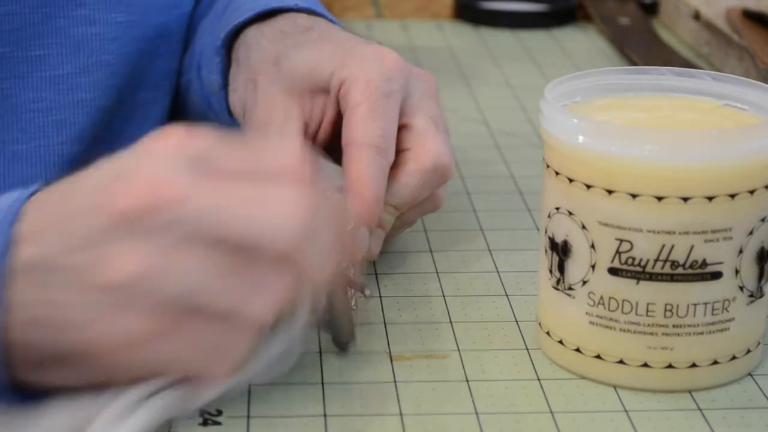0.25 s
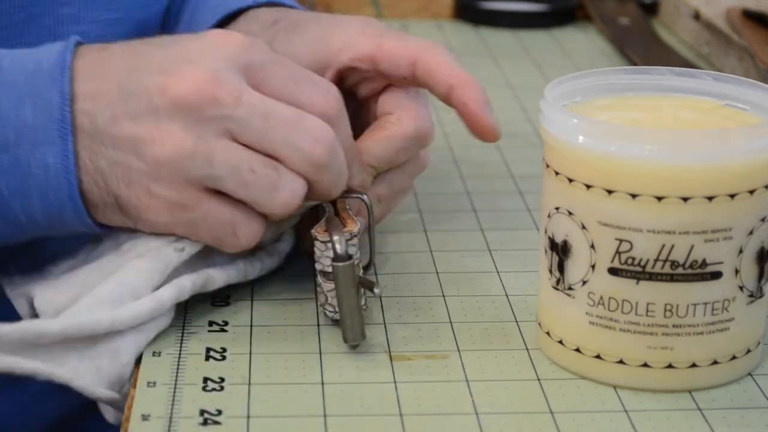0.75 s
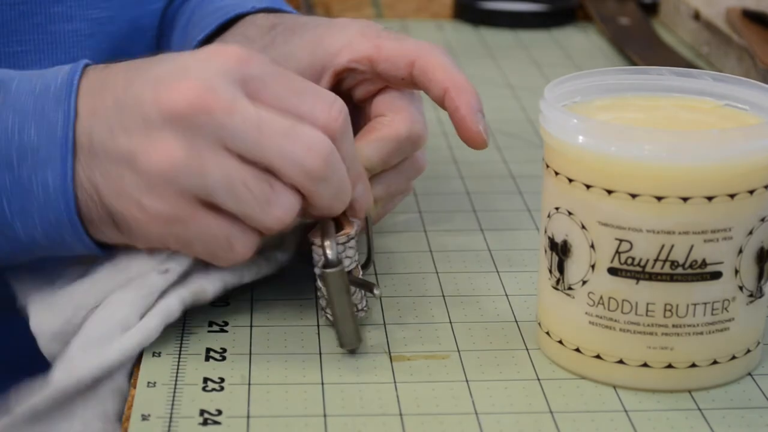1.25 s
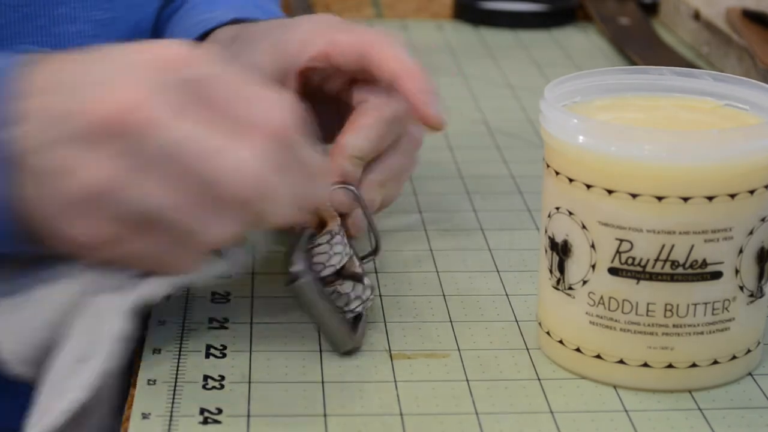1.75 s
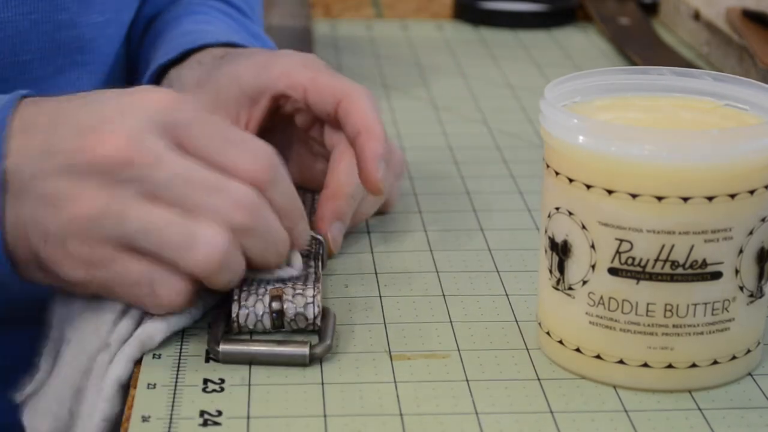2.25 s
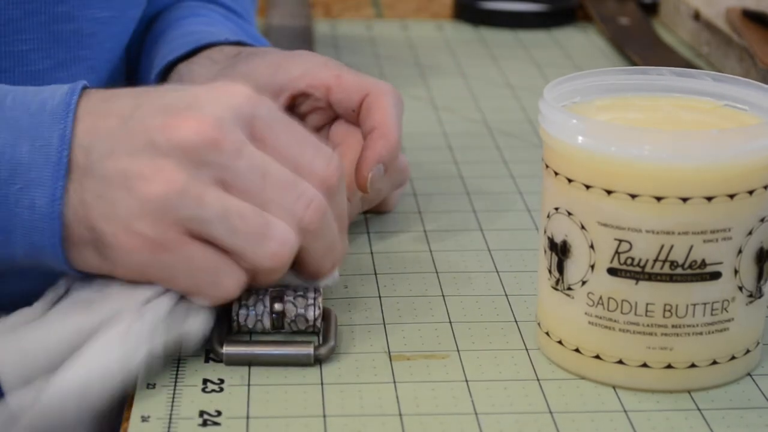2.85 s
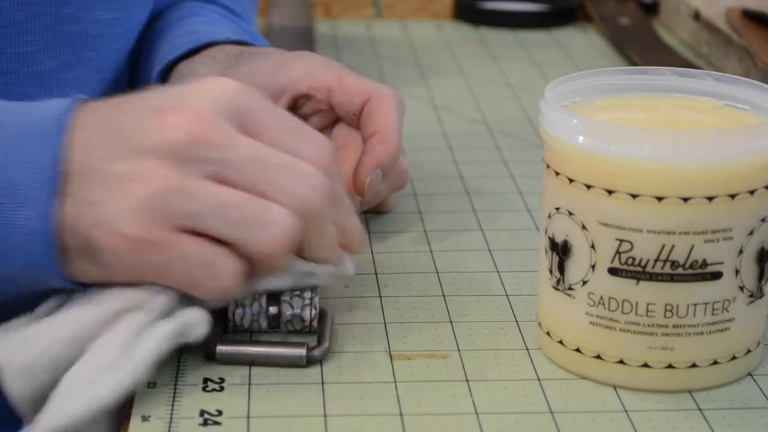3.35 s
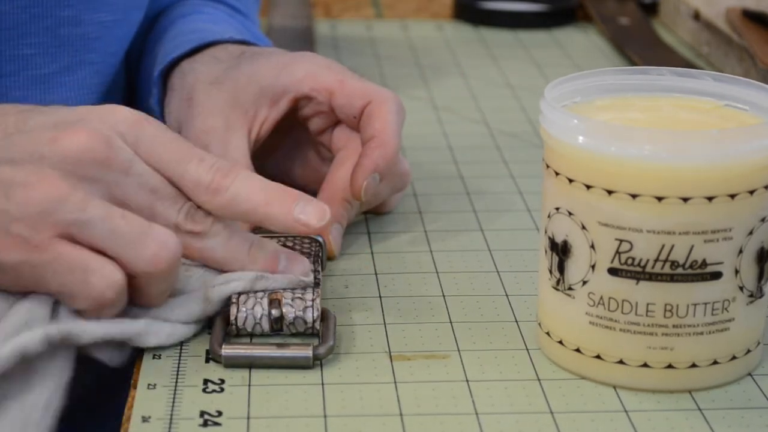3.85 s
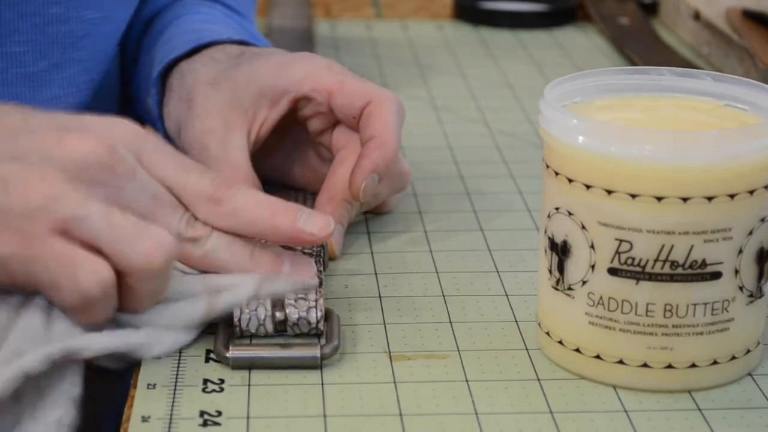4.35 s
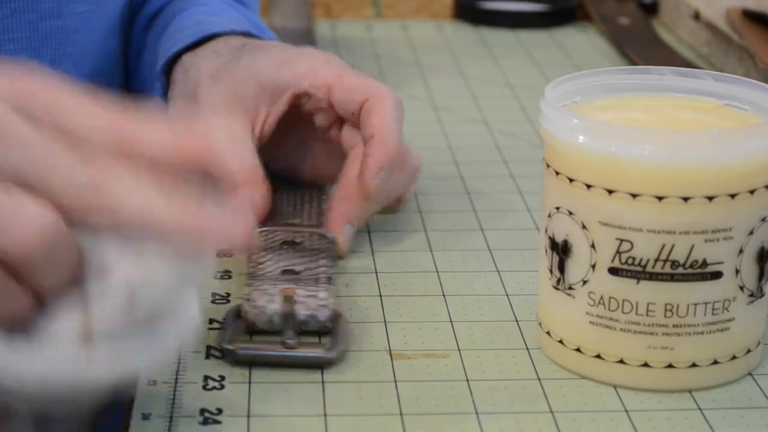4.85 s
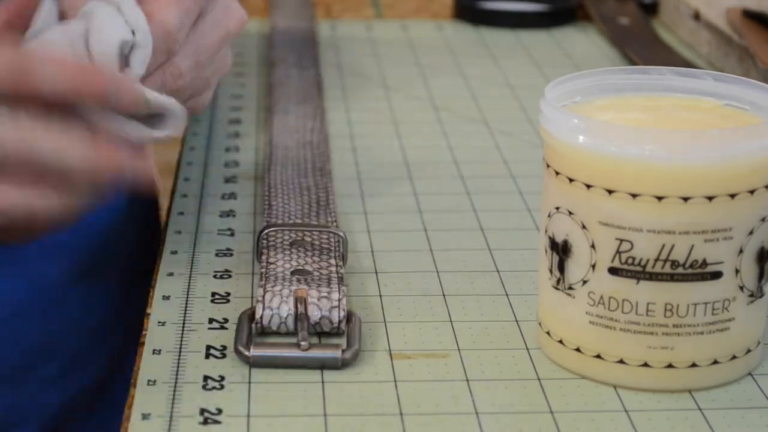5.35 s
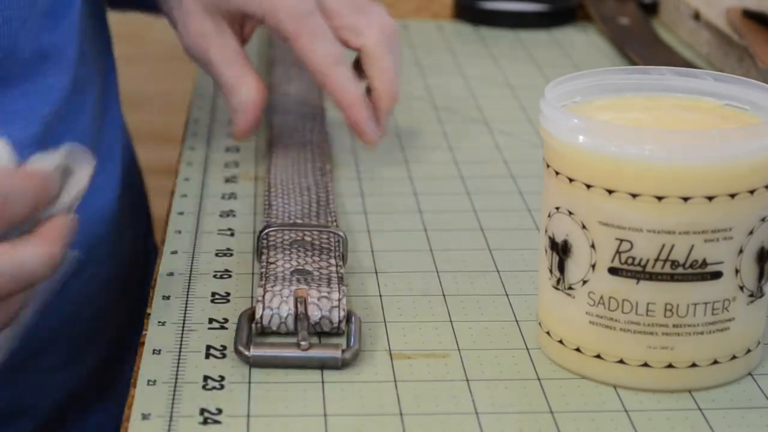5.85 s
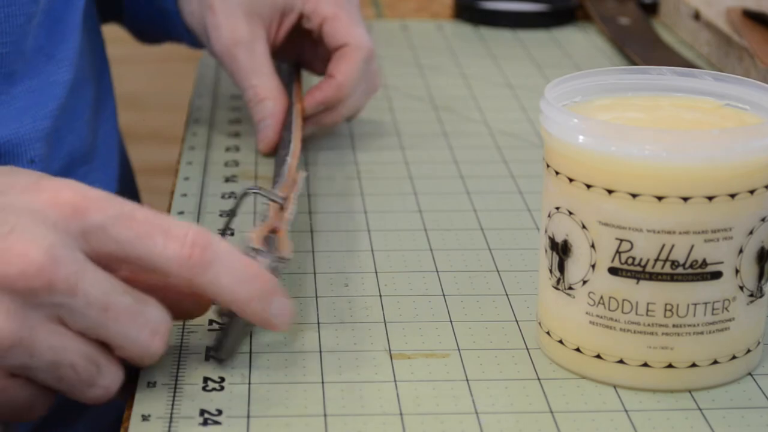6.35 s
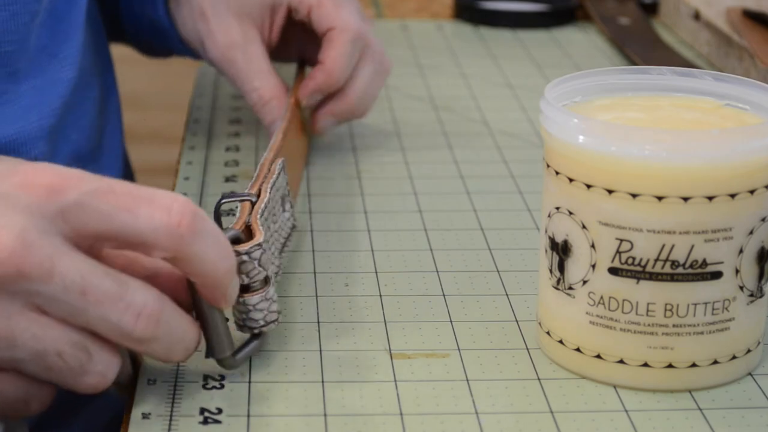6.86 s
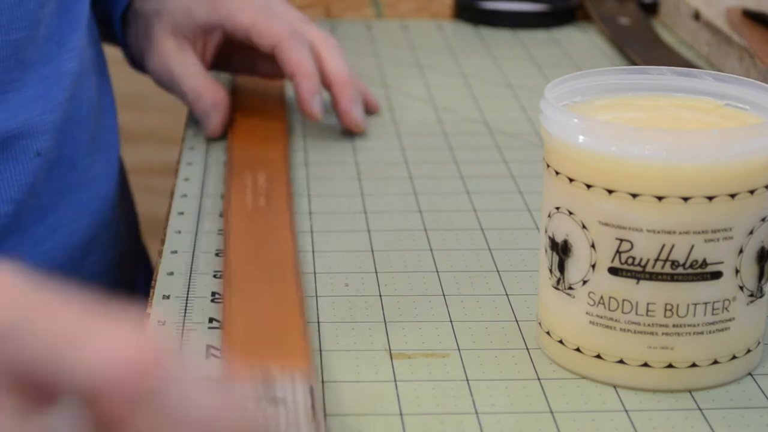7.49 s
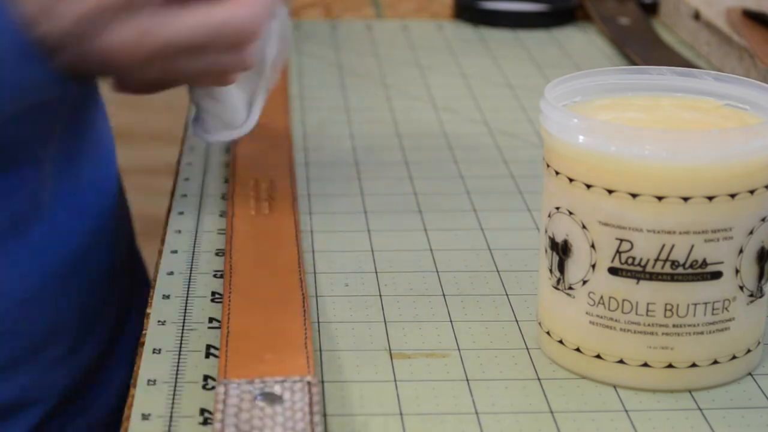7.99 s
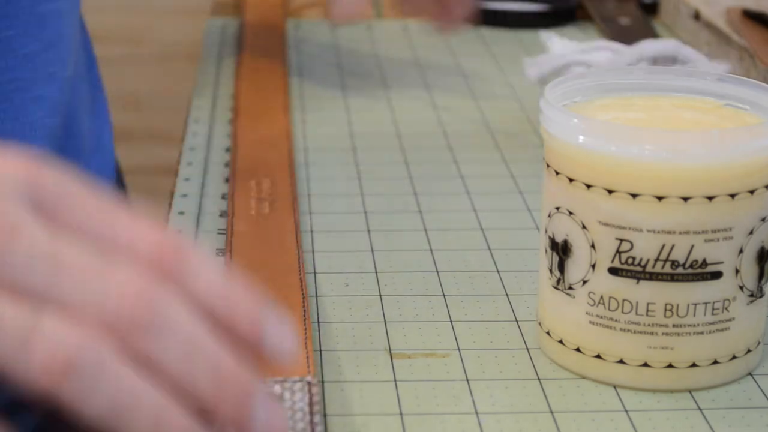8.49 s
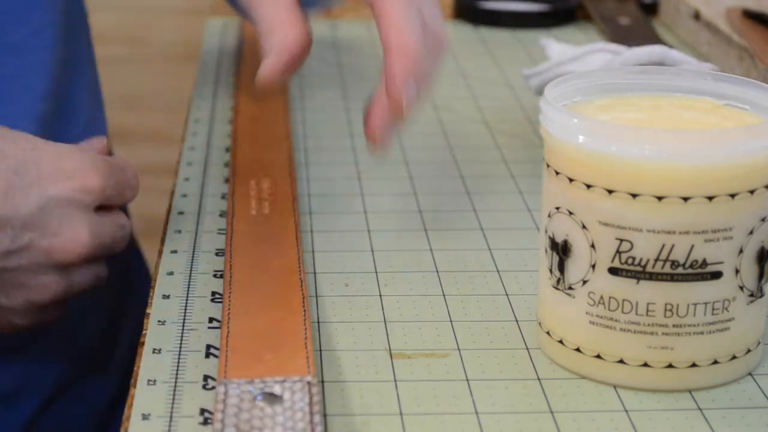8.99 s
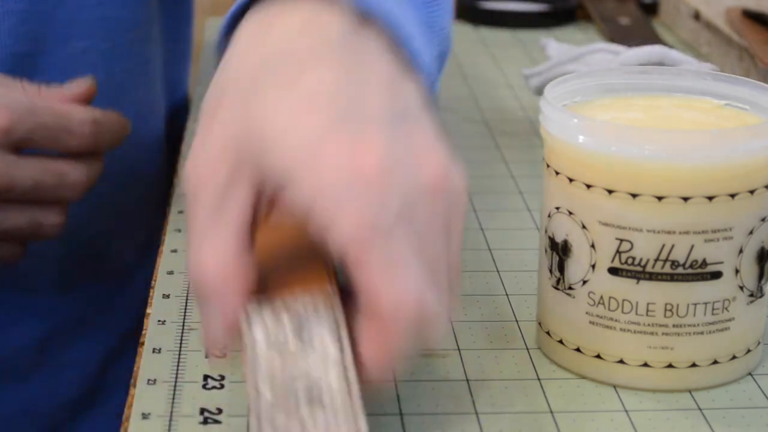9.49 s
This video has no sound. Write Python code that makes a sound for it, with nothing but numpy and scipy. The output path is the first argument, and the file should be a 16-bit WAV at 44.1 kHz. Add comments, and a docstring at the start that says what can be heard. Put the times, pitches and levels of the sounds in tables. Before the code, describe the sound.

Over a constant airy fan and a very faint thin whine, a metal buckle knocks on a matted bench and its loose parts chink. Cloth wipes hiss, then scrub back and forth with a muted tap per push. After sparse light handling, the belt drops with hard clacks and a low slap, and finally slides softly. Close, dry, small-room sound.

```python
"""A leather belt is wiped with a cloth and turned over on a workbench, over a steady ventilation fan and thin whine.
First come hissing wipes, a heavy buckle knock and chinks of the loose prong and roller, then a cluster of knocks.
From 2.5 s the cloth scrubs to and fro with a tap at each push; a knock and a bright chink follow at 4.4 s.
The strap scrapes over the mat, flops down among hard knocks near 7.6 s, and slides again at the end.
Blows are shaped impulses, chinks are decaying steel modes, rubbing is grainy noise; contacts get a small room."""
import sys
import numpy as np
from scipy import signal
from scipy.fft import rfft, irfft, next_fast_len
from scipy.io import wavfile
from scipy.ndimage import map_coordinates

SR = 44100
rng = np.random.default_rng(int(sys.argv[2]) if len(sys.argv) > 2 else 0)


def int16_out(signal):
    """Quantize to a 16-bit WAV file."""
    q = np.round(np.clip(np.atleast_2d(signal).T, -1, 1) * 32767)
    wavfile.write(sys.argv[1], SR, q.astype(np.int16))


N = 429093
TIME = np.arange(N) / SR  # s
SIZE = 2 ** 14  # samples in one contact
GRID = np.fft.rfftfreq(SIZE, 1 / SR)  # Hz

# colour of a dry steel click: (frequency [Hz], relative level [dB])
CLICK_COLOUR = [(1000, -17), (4500, 7.5), (6100, 2.5), (7000, -1), (8200, -1), (10500, -4.5), (13000, -3),
                (15500, -13)]
# cloth drawn along the edge of the upright belt: (time at the fastest [s], length [s], force [dB])
WIPE_STROKES = [(0.026, 0.11, 0), (1.097, 0.075, 0), (1.311, 0.086, 0), (1.52, 0.11, -1), (1.71, 0.083, -2),
                (1.877, 0.059, 1)]
# cloth scrubbed to and fro on the flat belt: (time at the end of the push [s], force [dB])
SCRUB_STROKES = [(2.479, -13.5), (2.657, -5.5), (2.854, 2), (3.0313, 1), (3.1944, -4), (3.344, -2),
                 (3.3633, -2), (3.7835, 0.5), (3.9652, 1.5), (4.1642, 4.5)]
# strap pushed over the mat: (time at the fastest [s], length [s], scrape level [dB], bump over scrape [dB])
STRAP_SLIDES = [(0.738, 0.065, -54.5, 1), (1.89, 0.082, -43.5, -15), (4.726, .11, -50, 4),
                (5.994, 0.1, -52.5, -3), (6.15, 0.11, -50, -11), (9.227, 0.067, -49, -5),
                (9.378, 0.096, -48.5, 1.5), (9.558, 0.12, -45.5, -3.5)]


def amp(db):
    """Decibels to gain."""
    return 10 ** (np.asarray(db) / 20)


def unit(x):
    """Scale to rms 1."""
    return x / np.sqrt(np.mean(np.abs(x) ** 2) + 1e-20)


def along(points, hz):
    """(Hz, value) points read on a log frequency axis."""
    f, v = np.transpose(points)
    return np.interp(np.log(hz + 1), np.log(f + 1), v)


def lift(peaks, hz):
    """Gain of resonances (Hz, width Hz, lift dB) that stand out of a flat response."""
    power = 1
    for f, width, db in peaks:
        power = power + max(amp(db) ** 2 - 1, 0) / (1 + (2 * (hz - f) / width) ** 2)
    return np.sqrt(power)


def wobble(rate):
    """A smooth random curve, rate knots a second."""
    knots = rng.standard_normal(int(N * rate / SR) + 4)
    return map_coordinates(knots, [TIME * rate])


def filtered(x, response):
    """x through a response of frequency."""
    m = next_fast_len(N + SIZE)
    return irfft(rfft(x, m) * response(np.fft.rfftfreq(m, 1 / SR)), m)[:N]


def causal(gain):
    """The most compact impulse (minimum phase) that has this gain on GRID."""
    cepstrum = irfft(np.log(np.maximum(gain, 1e-7)))
    cepstrum[1:SIZE // 2] *= 2
    cepstrum[SIZE // 2 + 1:] = 0
    return irfft(np.exp(rfft(cepstrum)))


def add(track, s, sound):
    """Mix a sound into the track at time s."""
    part = track[max(round(s * SR), 0):][:len(sound)]
    part += sound[:len(part)]


def room(sound, build_s=0.002, wall_hz=6000):
    """One contact with its early reflections and a fresh diffuse tail, at unchanged energy."""
    # reverberation time of the tail: (frequency [Hz], T60 [s])
    tail_t60 = [(100, 0.15), (400, 0.24), (1500, 0.18), (4000, .19), (8000, 0.17), (15000, 0.053)]
    # strength of the tail: (frequency [Hz], tail over direct sound [dB])
    tail_level = [(80, -1), (250, 14.5), (700, 3), (1600, -0.5), (2400, 0.5), (3500, -10.5), (6000, -5.5),
                  (14000, -5.5)]
    # echoes from near surfaces: (delay [s], gain before treble scattering [linear])
    near_walls = [(.0017, .3), (.00415, .65), (.0063, .25)]
    hz, t, noise = signal.stft(rng.standard_normal(SIZE), SR, nperseg=256)
    t60 = along(tail_t60, hz)[:, None]
    tail = signal.istft(noise * amp(-60 * t / t60) / np.sqrt(t60), SR, nperseg=256)[1][:SIZE]
    tail = tail * (1 - np.exp(-(TIME[:SIZE] / build_s) ** 2))  # echoes take a moment to build up
    soft = 1 / (1 + 1j * GRID / wall_hz)  # cluttered surfaces scatter the treble
    early = 1 + soft * sum(g * np.exp(-2j * np.pi * GRID * delay) for delay, g in near_walls)
    wet = amp(along(tail_level, GRID))
    total = np.sqrt(1 + np.abs(soft) ** 2 * sum(g * g for delay, g in near_walls) + wet ** 2)
    direct_path = early * rfft(causal(1 / total))
    tail_path = unit(rfft(tail)) * rfft(causal(wet / total))
    path = irfft(direct_path + tail_path)
    return signal.fftconvolve(sound, path[:-SIZE // 8])  # without the last eighth, where the circle wraps


def chatter(bounce_db=-11, spread_s=0.0023, count=5):
    """A first contact followed by a few weak micro-bounces, energy 1."""
    train = np.zeros(SIZE)
    train[0] = 1
    for wait, size in zip(rng.exponential(size=count), rng.standard_normal(count)):
        add(train, spread_s * wait, np.array([amp(bounce_db) * size]))
    return train / np.linalg.norm(train)


def blow(parts, hard_db, weight_db, click_db, contact_hz, steep=6):
    """A cushioned landing is mostly thud; bare steel adds snap and a chattering click."""
    snap_reach = 1.88  # the snap reaches this many times higher than the knock
    thud, knock, snap, click = parts

    def cushion(edge_hz):
        """A long contact excites no treble."""
        return 1 / np.sqrt(1 + (GRID / edge_hz) ** (2 * steep))

    bench = causal(np.hypot(amp(weight_db) * thud, knock) * cushion(contact_hz))
    steel_snap = causal(snap * cushion(snap_reach * contact_hz))
    steel_click = amp(click_db) * signal.fftconvolve(click, chatter())[:SIZE]
    return bench + amp(hard_db) * (steel_snap + steel_click)


def knocks(snap_gain_db=1):
    """The buckle lands freely on the bench, and each scrub rocks it into a tap under the fingers."""
    # landings, before cushioning and the snap gain:
    # (time [s], knock level [dB], hardness = snap over knock [dB], weight = thud over knock [dB],
    #  steel click over snap [dB])
    landings = [(0.248, 8.5, -35, -2.5, -7), (1.0876, -22.5, -2.5, -2, -7), (1.6527, -16.5, -13, -11, -20),
                (1.9257, 0.5, -6.5, -3.5, -7.5), (1.9282, 6, -11.5, -20, -9), (1.9364, -1.5, -7, -11, -24),
                (1.9725, -9.5, -2.5, -24, -13), (1.9833, -2.5, -13, -26, -10),
                (2.013, -12.5, -13, -18, -19), (3.085, -9, -24, -16, -15), (4.4354, 8.5, -14.5, -17, -8.5),
                (4.8066, -13.5, -26, -18, -20), (6.0975, -26.5, 0, -7, -11), (6.139, -19, -13, -2, -9),
                (7.5508, 3.5, -9.5, -8.5, -12), (7.581, -4.5, -10, -2, -12),
                (7.5926, 4.5, 1.5, -2.5, -12.5), (9.4708, -20.5, -6.5, -2, -15), (9.5396, -22, -6, -6, -21)]
    # colours of the low, middle and upper part of a blow: (frequency [Hz], relative level [dB])
    thud_colour = [(30, -57), (100, -7.5), (160, -15.5), (220, -4), (300, 0.5), (380, -3), (500, 1.5),
                   (650, -1), (1000, -6.5), (3000, -81)]
    knock_colour = [(100, -51), (450, -14), (650, -4), (1000, 5), (1300, -4), (1600, -0.5), (1900, -4),
                    (2350, 6.5), (3200, -22), (6000, -94)]
    snap_colour = [(1000, -52), (2200, -9), (2700, 2.5), (3100, 2), (3800, 0), (4200, -10), (4700, -11),
                   (5300, -35.5), (9000, -53)]
    # resonances of the buckle lying on the bench: (frequency [Hz], width [Hz], lift [dB])
    buckle_modes = [(228, 54, 4), (480, 45, -3.5), (990, 71, -2), (1120, 51, 5), (1262, 30, 0),
                    (1317, 37, 12.5), (1559, 67, 11), (1580, 40, 10), (1754, 4.5, 11.5), (1994, 22, 14),
                    (2440, 38, 4), (2644, 120, 10.5), (2970, 70, 6), (3120, 390, 6), (3600, 220, 2.5),
                    (3890, 130, 4.5), (4410, 110, 8)]
    # fingers damp some resonances and leave others: (frequency [Hz], gain [dB])
    held_colour = [(300, 2.5), (900, 0.5), (1550, 2), (2400, -3.5), (3100, 1.5), (3500, 2.5), (3900, 2.5),
                   (4700, -1.5), (8000, -3)]
    # a harder contact is shorter and reaches higher
    base_contact_hz, hardness_db_per_octave = 2850, 27
    # tap at scrub force 0 dB, before the fingers damp it
    tap_db, tap_hardness_db, tap_weight_db, tap_click_db, tap_contact_hz = -9, -10.5, -15, -11, 1990
    body = lift(buckle_modes, GRID)
    colours = thud_colour, knock_colour, snap_colour, CLICK_COLOUR
    thud, knock, snap, click = [unit(amp(along(colour, GRID)) * body) for colour in colours]
    parts = thud, knock, amp(snap_gain_db) * snap, causal(click)
    out = np.zeros(N)
    for s, db, hard_db, weight_db, click_db in landings:
        contact_hz = base_contact_hz * 2 ** (hard_db / hardness_db_per_octave)
        landing = blow(parts, hard_db, weight_db, click_db, contact_hz)
        add(out, s, amp(db) * room(landing))
    held = causal(amp(along(held_colour, GRID)))
    for s, force_db in SCRUB_STROKES:
        free_tap = blow(parts, tap_hardness_db, tap_weight_db, tap_click_db, tap_contact_hz)
        tap = signal.fftconvolve(free_tap, held)[:SIZE]
        add(out, s, amp(tap_db + force_db) * room(tap))
    return out


def flops():
    """The strap falls flat and slaps the bench with a low, ringless push."""
    # (time [s], energy [dB])
    slaps = [(7.553, -8), (7.594, 1)]
    # (frequency [Hz], relative level [dB])
    slap_colour = [(30, -24), (70, -14), (120, -17), (175, -3), (265, -0.5), (340, -8), (600, -42),
                   (2000, -72)]
    out = np.zeros(N)
    push = causal(unit(amp(along(slap_colour, GRID))))
    for s, db in slaps:
        add(out, s, room(amp(db) * push))
    return out


def ring(modes, scatter_db=3, detune=0.0043):
    """Steel modes of energy 1; each touch loads the parts anew and shifts their strength and pitch."""
    t = TIME[:SIZE]
    x = np.zeros(SIZE)
    for hz, db, t60 in modes:
        strength, pitch, phase = rng.standard_normal(3)
        decay = amp(db + scatter_db * strength - 60 * t / t60)
        x += decay * np.sin(2 * np.pi * hz * (1 + detune * pitch) * t + np.pi * phase)
    return x / np.linalg.norm(x)


def chinks(level_db=-1, touch_db=-9):
    """Loose prong and roller rattle on the frame, also at every wipe; each touch ticks and renews the ring."""
    # prong and roller swinging against the frame, before the overall level_db:
    # (time [s], energy of the low modes [dB], energy of the high modes [dB])
    swings = [(0.248, -28, -39), (0.296, -38, -46), (0.3373, -25.5, -53), (0.348, -34, -52),
              (1.2656, -43, -54), (1.3834, -43, -50), (1.778, -39, -52), (1.925, -22, -40),
              (4.434, -33, -19), (6.1166, -46, -38), (6.253, -40.5, -59), (7.5427, -26, -50),
              (7.585, -25, -15.5)]
    # free ringing of the steel parts: (frequency [Hz], relative level [dB], T60 [s])
    low_modes = [(5750, -4, 0.082), (6030, -1, 0.065), (6180, -5, 0.11), (5970, -10, 0.052),
                 (7900, -7, 0.093), (8600, 1, 0.076), (9100, -1, 0.049), (9500, -13, 0.067)]
    high_modes = [(10800, -10, .04), (12200, 2, 0.04), (12960, -2, 0.12), (13400, -2, .04),
                  (14160, -2, .045), (14900, -8, .03)]
    wipe_chink_db = -38.5  # at wipe force 0 dB, before level_db
    shake_high_db = -12  # a prong that is only shaken rings less in its high modes
    shaken = []
    for s, length_s, force_db in WIPE_STROKES:
        low_db = wipe_chink_db + force_db
        shaken.append((s, low_db, low_db + shake_high_db))
    out = np.zeros(N)
    click = causal(unit(amp(along(CLICK_COLOUR, GRID))))
    for s, low_db, high_db in swings + shaken:
        low = amp(low_db) * (amp(touch_db) * click + ring(low_modes))
        touch = low + amp(high_db) * ring(high_modes)
        rattle = signal.fftconvolve(touch, chatter(bounce_db=-15, spread_s=0.0086))[:SIZE]
        add(out, s, room(rattle))
    return amp(level_db) * out


def nails():
    """Tiny dry contacts of nails and buckle, too damped to ring."""
    # (time [s], energy [dB])
    ticks = [(2.0235, -38), (2.4774, -43), (2.497, -41), (2.6707, -34), (2.9547, -42), (3.0506, -34),
             (4.6905, -42), (4.9029, -40), (5.55, -41), (6.7925, -42), (6.993, -41), (7.3264, -43),
             (7.7085, -43)]
    out = np.zeros(N)
    click = causal(unit(amp(along(CLICK_COLOUR, GRID))))
    for s, db in ticks:
        add(out, s, room(amp(db) * click))
    return out


def swell(s, length_s, db):
    """Gain of one hand movement that speeds up and slows down around time s."""
    u = (TIME - s) / length_s
    return amp(db) / (1 + (2 * u) ** 2) ** 2 * (np.abs(u) < 3)  # silent beyond 3 lengths


def scrubbing(offset_s):
    """Gain of all scrub strokes, fastest offset_s after their taps; rubbing grows less than force."""
    push_s, growth = 0.072, 0.34  # stroke length; dB of rubbing per dB of force
    return sum(swell(s + offset_s, push_s, growth * force_db) for s, force_db in SCRUB_STROKES)


def friction(colour, grain_db, grain_rate):
    """Many small slips of uneven strength, rms 1."""
    slips = rng.standard_normal(N) * amp(grain_db * wobble(grain_rate))
    return unit(filtered(slips, lambda hz: amp(along(colour, hz))))


def hisses():
    """Cloth and fingers slip on the leather in fine, bright grains."""
    # fingers slipping on the leather: (time at the fastest [s], length [s], level [dB])
    finger_slips = [(0.28, 0.098, -55.5), (0.875, .1, -71), (7.397, 0.25, -66.5), (7.503, .04, -60),
                    (9.647, 0.042, -61.5)]
    # (frequency [Hz], relative level per Hz [dB])
    hiss_colour = [(600, -10), (2000, 21), (3600, 18), (5500, 3.5), (8000, -1), (10500, 5), (13000, 0),
                   (15500, -8)]
    wipe_db, push_db, return_db = -62, -64.5, -70  # at force 0 dB
    gain = amp(wipe_db) * sum(swell(*row) for row in WIPE_STROKES)
    gain += amp(push_db) * scrubbing(-0.01)  # a push is fastest just before its tap
    gain += amp(return_db) * scrubbing(0.081)  # the hand comes back after it
    gain += sum(swell(*row) for row in finger_slips)
    return gain * friction(hiss_colour, grain_db=6.5, grain_rate=690)


def scrapes():
    """The strap scrapes over the mat in coarser, midrange grains."""
    # (frequency [Hz], relative level per Hz [dB])
    scrape_colour = [(150, -5), (500, 8), (1200, 11.5), (2200, 3.5), (3800, -8.5), (4800, -15), (6000, -28),
                     (12000, -39)]
    gain = sum(swell(s, length_s, db) for s, length_s, db, weight_db in STRAP_SLIDES)
    return gain * friction(scrape_colour, grain_db=3.5, grain_rate=130)


def bumps():
    """Wipes, scrub pushes and strap slides bump the belt with a low rumble."""
    # (frequency [Hz], relative level per Hz [dB])
    rumble_colour = [(30, -23), (65, 4), (100, -10.5), (200, 0), (320, -6), (600, -9), (2000, -49.5)]
    wipe_db, push_db = -50.5, -53  # at force 0 dB
    gain = amp(wipe_db) * sum(swell(*row) for row in WIPE_STROKES)
    gain += amp(push_db) * scrubbing(-0.01)
    gain += sum(swell(s, length_s, db + weight_db) for s, length_s, db, weight_db in STRAP_SLIDES)
    return gain * friction(rumble_colour, grain_db=3.5, grain_rate=64)


def fan(air_db=-49.54, drift=0.6, flutter_db=1.5):
    """Air rushing through a duct, with slightly unsteady motor, blade and electric tones."""
    # air noise: (frequency [Hz], relative level per Hz [dB])
    air_colour = [(12, -51), (20, -12), (54, -2), (87, -11.5), (133, -7), (252, -4.5), (274, -3.5),
                  (333, -7), (416, -5.5), (452, -7.5), (491, -6), (932, -4.5), (1720, -7), (6190, -39),
                  (15500, -49.5)]
    # duct resonances: (frequency [Hz], width [Hz], lift [dB])
    duct_modes = [(44.5, 12, 5), (193, 25, 5), (927, 35, 5.5), (1010, 112, 5.5), (1251, 40, 6),
                  (1644, 15, 5.5)]
    # motor, blade and electric tones: (frequency [Hz], rms level before flutter [dB])
    hum_tones = [(48.4, -81), (119, -68.5), (146, -64.5), (247.6, -65.5), (339.1, -64), (452.2, -65),
                 (683.7, -66), (909.8, -65), (1513, -65.5)]
    noise = rng.standard_normal(N)
    air = unit(filtered(noise, lambda hz: amp(along(air_colour, hz)) * lift(duct_modes, hz)))
    tones = np.zeros(N)
    for hz, db in hum_tones:
        level = amp(db + flutter_db * wobble(3.16))
        tones += level * np.sin(2 * np.pi * hz * TIME + drift * wobble(5))  # drift in radians
    return amp(air_db) * air + np.sqrt(2) * tones


def whine(hz=15671, rms_db=-82):
    """Thin whine of electronics: one steady sine."""
    return np.sqrt(2) * amp(rms_db) * np.sin(2 * np.pi * hz * TIME)


def scene():
    """Buckle, hands and workshop background at one microphone."""
    buckle_and_strap = knocks() + flops() + chinks() + nails()
    handling = hisses() + scrapes() + bumps()
    background = fan() + whine()
    return (buckle_and_strap + handling + background)[None]


def record(dry):
    """Keep nothing above the band limit of 16 kHz."""
    return filtered(dry[0], lambda hz: hz < 16000)[None]


dry = scene()
out = record(dry)
int16_out(out)
```